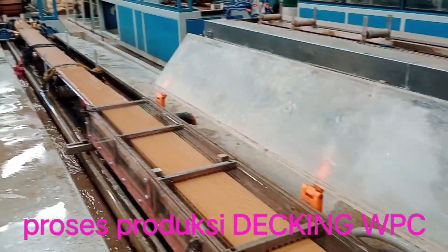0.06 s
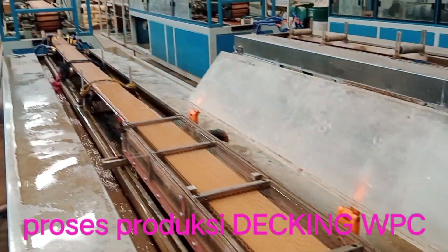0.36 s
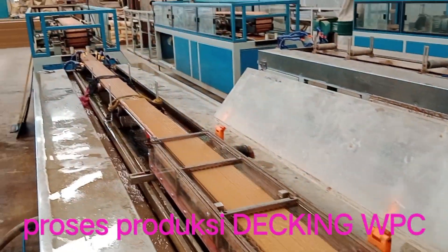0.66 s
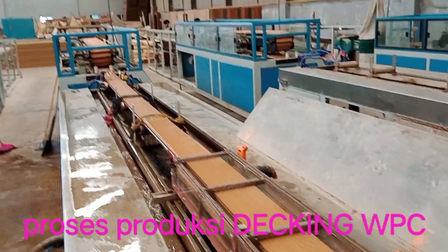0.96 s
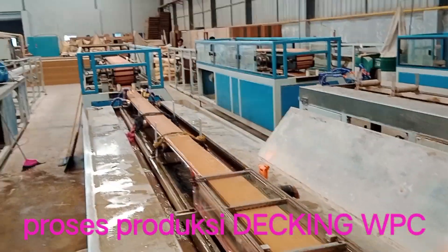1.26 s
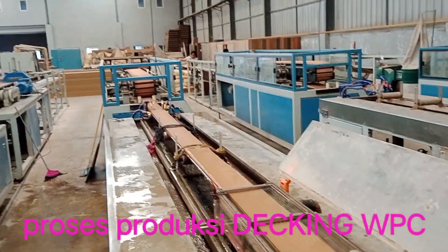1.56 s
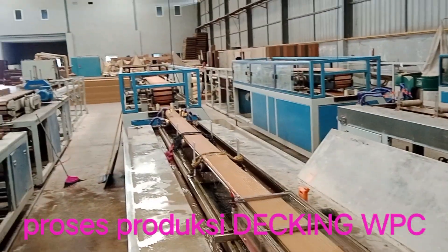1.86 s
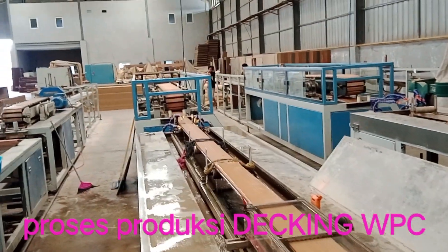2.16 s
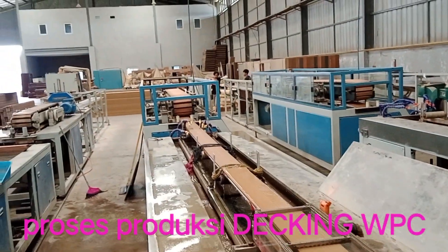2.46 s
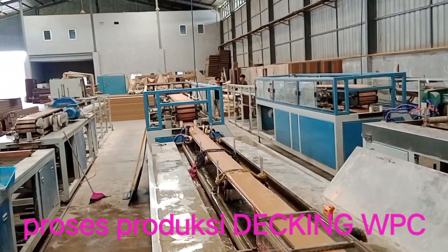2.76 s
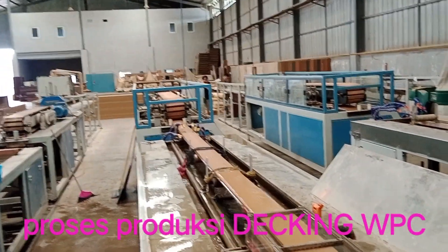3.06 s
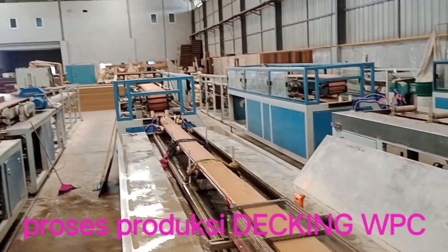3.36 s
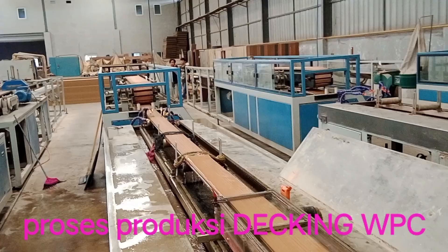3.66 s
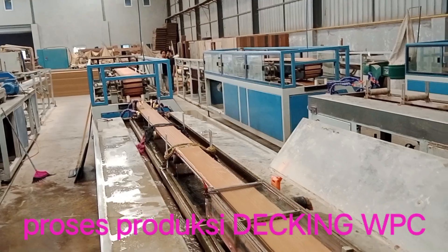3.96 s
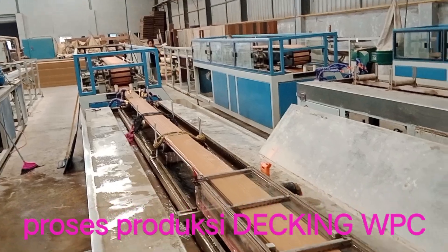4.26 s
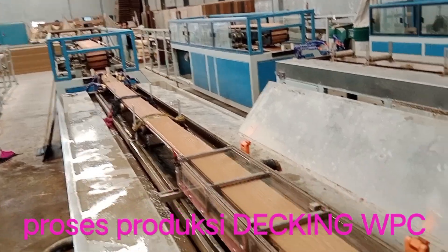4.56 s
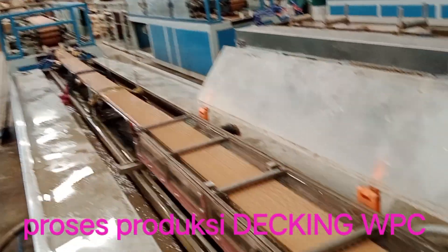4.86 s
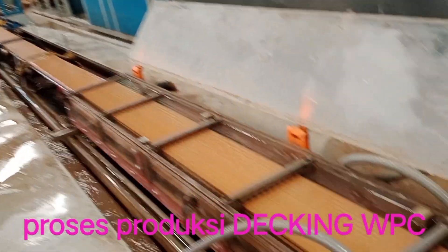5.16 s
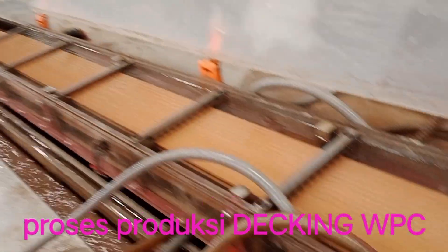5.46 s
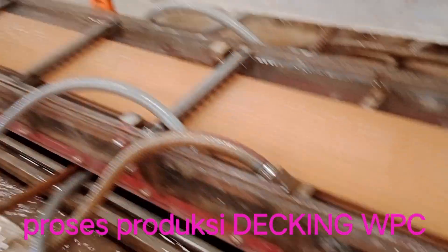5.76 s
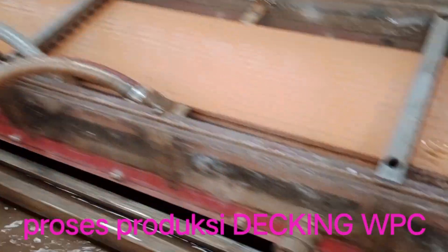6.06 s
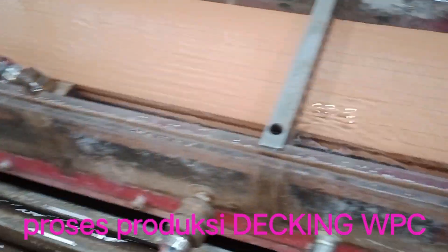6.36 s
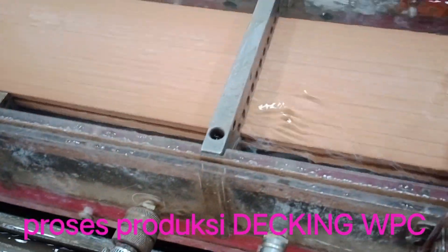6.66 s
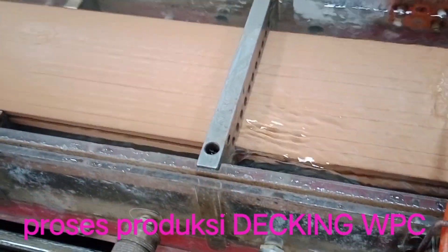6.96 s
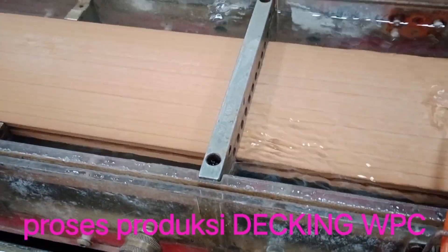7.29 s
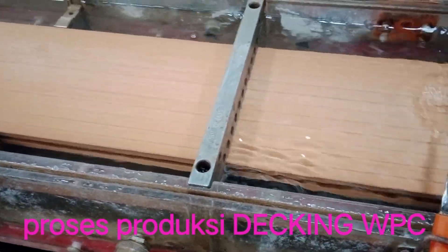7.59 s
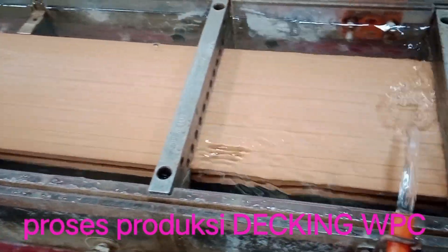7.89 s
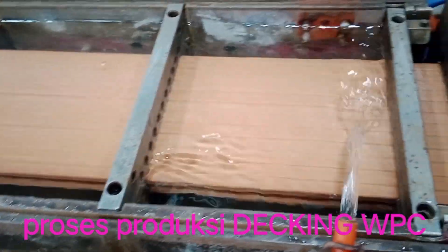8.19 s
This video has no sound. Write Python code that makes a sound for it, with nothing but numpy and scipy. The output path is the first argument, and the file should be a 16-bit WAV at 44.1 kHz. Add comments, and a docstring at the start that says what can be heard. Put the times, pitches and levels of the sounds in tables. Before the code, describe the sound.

A plastic extrusion line runs throughout in a factory hall. A vacuum pump holds one loud, nearly pure, medium-low note with a slight flutter. Just below it another motor hums, swelling and fading, among wavering motor tones and a thin high whine. Behind them lies the steady roar of the hall, and a faint deep rumble comes and goes. Water jets hiss with fine droplet ticks and a little gurgle, receding over the first two seconds as the microphone draws back into the aisle. Faint, thin squeaks come at about 2.4 and 2.8 seconds, and a slightly lower one at 4.1. From about 5 seconds the microphone swings down over the open steel cooling trough, arriving near 6.3. The hiss turns fuller, churning and bubbling water comes through clearly, and the pump note grows louder. This close sound holds until the end, at about 8.4 seconds.

```python
"""A vacuum pump sings one loud note on a plastic extrusion line, its vanes chopping the air.
Motors hum and whine around it, over the roar of the factory hall and a faint deep rumble.
Cooling water hisses from jets and bubbles in an open trough; after five seconds the microphone
swings down close over it. Something on the line squeaks faintly three times."""
import sys
import numpy as np
from scipy import signal
from scipy.fft import rfft, irfft, next_fast_len
from scipy.io import wavfile
from scipy.ndimage import uniform_filter1d

SR = 44100
rng = np.random.default_rng(int(sys.argv[2]) if len(sys.argv) > 2 else 0)


def wav_out(sig):
    """Save sig, one row per channel (or a flat mono array), as 16-bit PCM at SR to the path in sys.argv[1]."""
    wavfile.write(sys.argv[1], SR, np.round(np.clip(np.atleast_2d(sig).T, -1, 1) * 32767).astype(np.int16))


N = 371763
TIME = np.arange(N) / SR


def gain_of(db):
    """Decibels to amplitude."""
    return 10 ** (np.asarray(db) / 20)


def unit_rms(x):
    """Scales to rms 1."""
    return x / np.sqrt(np.mean(x ** 2) + 1e-20)


def coloured(x, curve):
    """Applies an EQ curve, its points joined along a log frequency axis."""
    size = next_fast_len(N + 8192)
    hz, db = np.transpose(curve)
    eq_db = np.interp(np.log(np.fft.rfftfreq(size, 1 / SR) + 1), np.log(hz + 1), db)
    return irfft(rfft(x, size) * gain_of(eq_db), size)[:N]


def waver(rate_hz):
    """Slow random motion of rms 1, with changes up to about the given rate."""
    hz = np.fft.rfftfreq(4096, 1 / 400)
    slow = irfft(rfft(rng.standard_normal(4096)) / (1 + (hz / rate_hz) ** 2))
    return unit_rms(np.interp(TIME, np.arange(4096) / 400, slow))


def turbulence(patchy_db, flicker_db):
    """Noise whose strength shifts in small patches of time and pitch, and flickers as a whole."""
    frames = N // 256 + 5
    real, imaginary, patches = rng.standard_normal((frames, 513, 3)).T
    patches = uniform_filter1d(patches, size=9, axis=0)  # smooth across pitch
    patches = unit_rms(uniform_filter1d(patches, size=8, axis=1))  # and across time
    flicker = unit_rms(uniform_filter1d(rng.standard_normal(frames), size=4))
    spectra = (real + 1j * imaginary) * gain_of(patchy_db * patches + flicker_db * flicker)
    return unit_rms(signal.istft(spectra, nperseg=1024, noverlap=768)[1][:N])


# The microphone's move. Each row: time in seconds, closeness from 0 (aisle) to 1 (over the trough).
MIC_PATH = [(0, 0.26), (1.9, 0.073), (3.4, 0.039), (3.9, 0), (5.1, 0.2), (5.6, 0.4), (6.35, 0.95),
            (8.43, 0.94)]


def closeness():
    """How close the microphone is to the trough at every sample."""
    seconds, close = np.transpose(MIC_PATH)
    return np.interp(TIME, seconds, close)


def nearing(aisle_db, trough_db, close):
    """Gain of a source on the way from the aisle to the trough."""
    return gain_of(aisle_db + close * (trough_db - aisle_db))


def past_rim(close, rim=0.23, span=0.09):
    """0 while the trough's rim hides the water, 1 with a clear view of it."""
    return .5 + .5 * np.tanh((close - rim) / span)


# The pump's faint upper overtones. Each row: multiple of the pitch, level from the aisle in dB,
# level at the trough in dB, phase wander in radians.
PUMP_OVERTONES = [(3, -38.5, -61, 1.6), (4, -42, -41, 1.2), (5, -45.5, -43, 0.81), (6, -49.5, -42, 1),
                  (7, -60, -56, 0.9), (10, -68, -57, .8)]


def pump(close, pitch_hz=360.65):
    """Vanes chop the air into a nearly pure note; its overtones waver as they cross the hall."""
    phase = 2 * np.pi * pitch_hz * TIME + 0.11 * waver(rate_hz=1.1)
    drift = gain_of(0.37 * waver(rate_hz=4.7))
    flutter = 1 + 0.059 * waver(rate_hz=13)
    note = nearing(-18.5, -14, close ** 0.45) * drift * flutter * np.sin(phase)
    # The octave is less steady, and drops back by the trough as the main note grows.
    drift = gain_of(1.15 * waver(rate_hz=0.83))
    flutter = 1 + 0.17 * waver(rate_hz=12)
    wander = (0.35 + 0.68 * close) * waver(rate_hz=3.5)
    note += nearing(-30, -34, close) * drift * flutter * np.sin(2 * phase + wander)
    for multiple, aisle_db, trough_db, wander_rad in PUMP_OVERTONES:
        flutter = unit_rms(1 + 0.4 * waver(rate_hz=13))
        overtone = np.sin(multiple * phase + wander_rad * waver(rate_hz=5.5))
        note += nearing(aisle_db, trough_db, close) * flutter * overtone
    return np.sqrt(2) * note


# The drone of motors and fans, and the thin whine of the drives.
# Each row: pitch in Hz, level from the aisle in dB, level at the trough in dB.
MOTOR_TONES = [(96.5, -64.5, -53), (147, -52.5, -46.5), (170.2, -47, -38.5), (241, -54.5, -45),
               (603.5, -40, -49.5), (743.5, -41.5, -35.5), (850.6, -52.5, -44.5), (890, -50, -49.5)]
DRIVE_WHINES = [(3757, -55, -54), (3951, -72, -54)]


def motors(close, tones, unsteady, wander_rad):
    """Running machines hold wavering tones, each with its own strength at the two places."""
    out = np.zeros(N)
    for hz, aisle_db, trough_db in tones:
        flutter = 1 + unsteady * waver(rate_hz=9.9)
        tone = np.sin(2 * np.pi * hz * TIME + wander_rad * waver(rate_hz=3.8))
        out += nearing(aisle_db, trough_db, close) * unit_rms(flutter * tone)
    return out


# The hall's bed of noise, fullest in the low mids. Each row: frequency in Hz, relative level in dB.
ROAR_EQ = [(25, -52), (50, -31), (100, -9), (170, -2), (335, 1.5), (430, -4), (530, -6.5), (730, -6),
           (900, -7), (1100, -5), (1450, -9), (1600, -10.5), (2150, -12), (2450, -16.5), (3700, -25),
           (4500, -46.5)]


def hall_roar(level_db=-24, echo_gain=0.077, echoes=10):
    """Fans and drives blur into one roar; echoes off cabinets and walls ripple its spectrum."""
    noise = turbulence(patchy_db=1.18, flicker_db=-0.07)
    roar = noise.copy()
    for lateness, polarity in rng.random((echoes, 2)):
        delay_s = (.1 + lateness) * .04
        roar += echo_gain * np.sign(polarity - .5) * np.roll(noise, int(delay_s * SR))
    return gain_of(level_db) * unit_rms(coloured(roar, ROAR_EQ))


def drops(low_hz, high_hz, per_s, cycles, spread_db, glide, sizes):
    """Bubbles of many sizes: each rings for a few cycles and rises in pitch as it nears the surface."""
    out = np.zeros(N)
    for hz in np.geomspace(low_hz, high_hz, sizes):
        strength = gain_of(spread_db * np.minimum(rng.exponential(1, N), 4))
        births = strength * (rng.random(N) < per_s / sizes / SR)
        age = np.arange(0, 1, hz / (cycles * SR))  # 0 to 1 over a 40 dB decay
        ring = np.sin(2 * np.pi * cycles * age * (1 + glide * age)) * np.exp(-np.log(100) * age)
        out += unit_rms(signal.oaconvolve(births, ring)[:N])
    return unit_rms(out)


# The spray, thin from the aisle and fuller over the trough, and the fine fizz that the rim hides.
# Each row: frequency in Hz, relative level in dB.
SPRAY_FAR_EQ = [(1500, -10), (4000, -34), (5500, -3), (6800, 2), (8000, 2), (10000, -4.5), (11000, -2),
                (12500, -3.5), (15400, -0.5)]
SPRAY_NEAR_EQ = [(1500, -5), (3000, -7.5), (3500, -2.5), (5500, -7), (6900, 4), (8700, -0.5), (10000, -5.5),
                 (11250, -18), (12200, -5), (13000, -0.5), (14000, -12.5), (15400, -4)]
FIZZ_EQ = [(7000, -30), (9800, 0), (15400, -0.5)]


def spray(close, tick_gain=0.37, fizz_gain=0.6):
    """Jets hiss and fine droplets tick; fizz comes in over the rim, and close up the hiss is louder."""
    ticks = drops(2600, 16600, per_s=4200, cycles=7.4, spread_db=4.0, glide=0.038, sizes=12)
    water = turbulence(patchy_db=1.4, flicker_db=0.23) + tick_gain * ticks
    fizz = unit_rms(coloured(rng.standard_normal(N), FIZZ_EQ))
    far = unit_rms(coloured(water, SPRAY_FAR_EQ)) + fizz_gain * past_rim(close) * fizz
    near = unit_rms(coloured(water, SPRAY_NEAR_EQ))
    blend = close ** 1.4
    return nearing(-35.5, -29.5, blend) * ((1 - blend) * far + blend * near)


# The gurgle, a low body under bubbly mids. Each row: frequency in Hz, relative level in dB.
GURGLE_EQ = [(50, -29), (160, 9.5), (300, -11.5), (520, -8.5), (750, -0.5), (1050, -14), (1250, -4.5),
             (1450, -5), (1650, -4.5), (2170, -1), (2500, -11.5), (3100, -17.5)]


def trough(close, open_db=-29, bubble_gain=0.51, hidden_gain=0.2):
    """Water churns and bubbles in the steel trough, heard fully once the microphone clears its rim."""
    bubbles = drops(624, 2880, per_s=500, cycles=22.4, spread_db=-0.5, glide=.06, sizes=18)
    water = turbulence(patchy_db=2.0, flicker_db=0.5) + bubble_gain * bubbles
    exposure = hidden_gain + (1 - hidden_gain) * past_rim(close)
    return gain_of(open_db) * exposure * unit_rms(coloured(water, GURGLE_EQ))


def swelling(swells, rest_db):
    """A resting gain with smooth arches added on top."""
    gain = gain_of(rest_db)
    for peak_s, length_s, db in swells:
        offset = np.clip((TIME - peak_s) / length_s, -.5, .5)
        gain = gain + gain_of(db) * np.cos(np.pi * offset) ** 2
    return gain


# The rumble's dark tone. Each row: frequency in Hz, relative level in dB.
RUMBLE_EQ = [(20, -39), (40, -26), (60, -8.5), (80, -5), (105, 3.5), (160, -16), (400, -57)]
# Its swells. Each row: time of the peak in seconds, length in seconds, level in dB.
RUMBLE_SWELLS = [(1.025, 0.84, -38), (2.15, 0.65, -37), (4.75, 0.2, -46), (5.84, 0.32, -37),
                 (7.68, 0.23, -35), (8.35, .3, -37)]


def rumble():
    """A faint deep rumble comes and goes under the roar."""
    noise = unit_rms(coloured(rng.standard_normal(N), RUMBLE_EQ))
    return swelling(RUMBLE_SWELLS, rest_db=-57.5) * noise


# The hum's swells. Each row: time of the peak in seconds, length in seconds, level in dB.
MOTOR_HUM_SWELLS = [(1.45, 1.6, -30.5), (3.1, 1.25, -28), (4.27, 0.47, -31), (5.2, 0.57, -30),
                    (5.76, 0.42, -29)]


def motor_hum(pitch_hz=308, wander_rad=0.6, unsteady=0.2):
    """Another motor hums just under the pump's note, swelling and fading."""
    phase = 2 * np.pi * pitch_hz * TIME + wander_rad * waver(rate_hz=4)
    flutter = 1 + unsteady * waver(rate_hz=4)
    return swelling(MOTOR_HUM_SWELLS, rest_db=-43.5) * unit_rms(flutter * np.sin(phase))


# Faint squeaks on the line. Each row: start in seconds, length in seconds, pitch in Hz, level in dB.
LINE_SQUEAKS = [(2.423, 0.255, 1745, -34.5), (2.762, 0.12, 1770, -37), (4.095, 0.26, 1477, -33)]


def squeaks(rise=0.012):
    """Short thin tones that swell, rise a little and fade."""
    out = np.zeros(N)
    for start_s, length_s, hz, db in LINE_SQUEAKS:
        progress = np.clip((TIME - start_s) / length_s, 0, 1)
        phase = 2 * np.pi * np.cumsum(hz * (1 + rise * (progress - .5))) / SR
        tone = np.sqrt(2) * np.sin(phase + .6 * waver(rate_hz=32))
        out += gain_of(db) * np.sin(np.pi * progress) * tone
    return out


def scene():
    """Machines and water mixed at one moving microphone."""
    close = closeness()
    drone = motors(close, MOTOR_TONES, unsteady=0.48, wander_rad=1.09)
    whine = motors(close, DRIVE_WHINES, unsteady=0.49, wander_rad=0.7)
    machines = pump(close) + motor_hum() + drone + whine + hall_roar() + rumble() + squeaks()
    return (machines + spray(close) + trough(close))[None]


# The microphone's colour, with one deep notch in the treble. Each row: frequency in Hz, gain in dB.
MIC_EQ = [(3750, 0.5), (4200, -3), (4550, -18), (4820, -45), (5100, -16.5), (5500, -4), (6500, -2),
          (8900, 2.5), (9400, -5.5), (9900, 3), (13200, 1.5), (13900, -3.5), (14900, 1.5)]


def record(dry):
    """The microphone colours the mix, and a steep low-pass takes off the very top."""
    low_pass = signal.firwin(1023, cutoff=15520, window=("kaiser", 9), fs=SR)
    return signal.oaconvolve(coloured(dry[0], MIC_EQ), low_pass, "same")[None]


dry = scene()
out = record(dry)
wav_out(out)
```